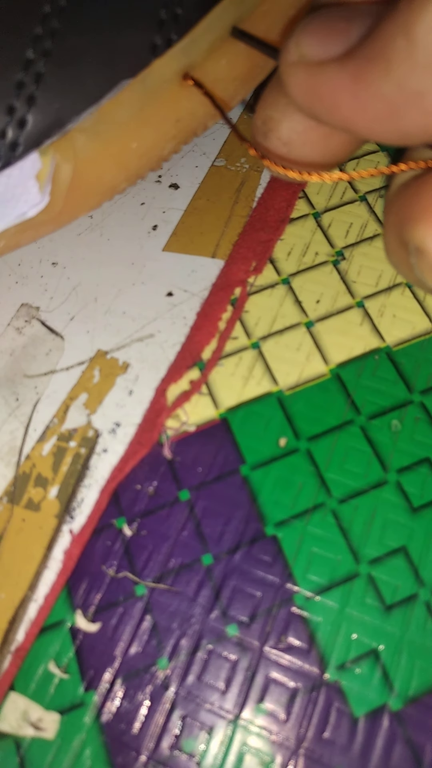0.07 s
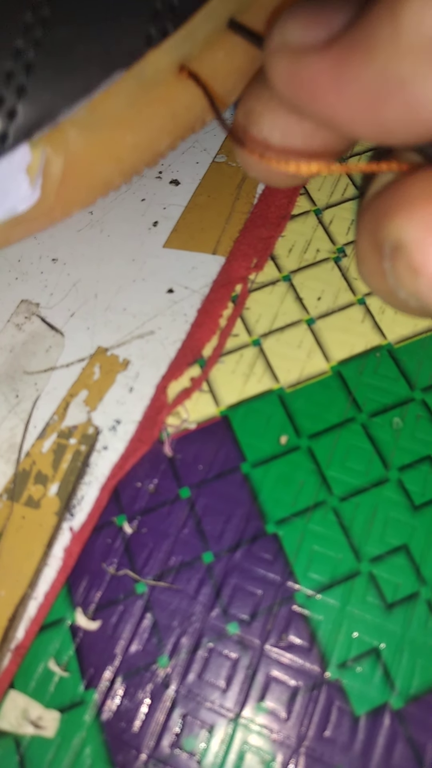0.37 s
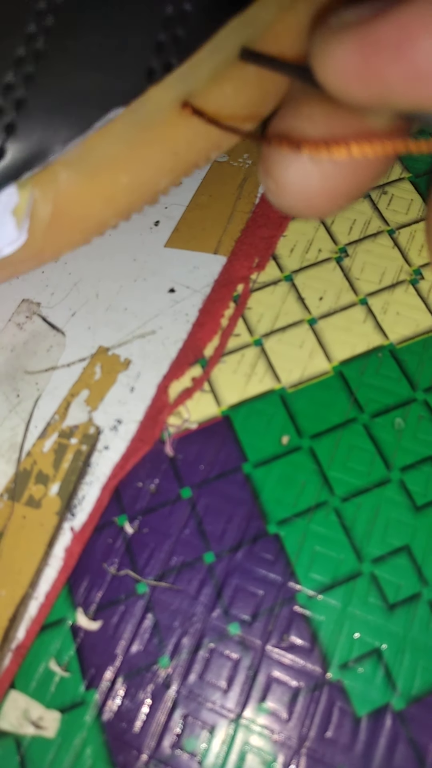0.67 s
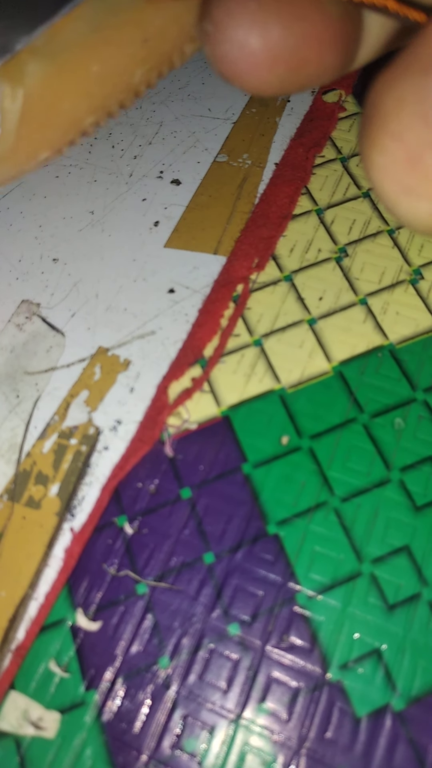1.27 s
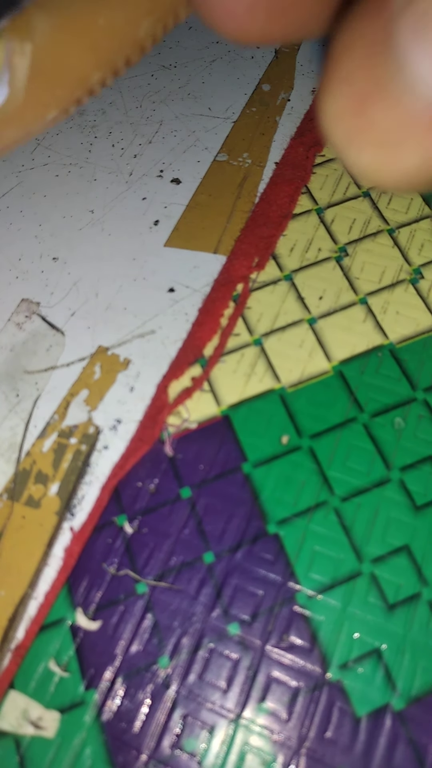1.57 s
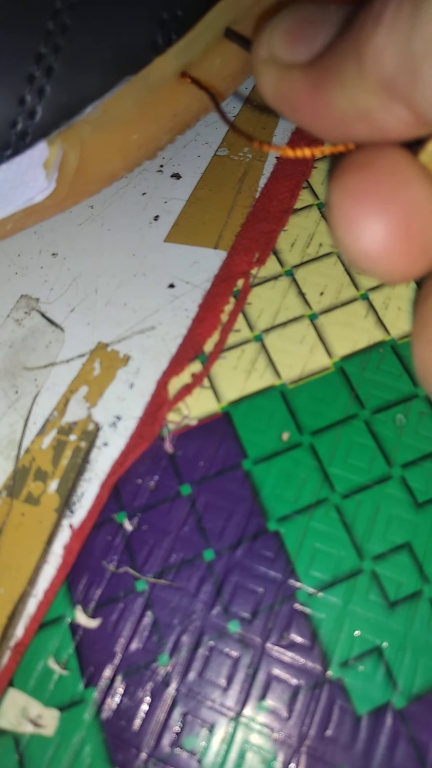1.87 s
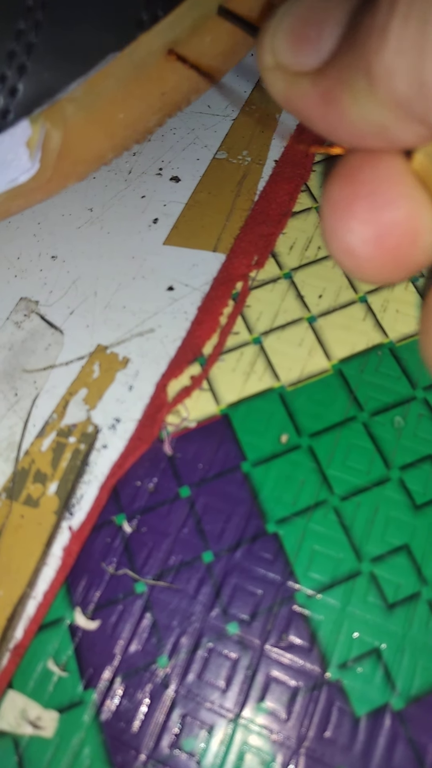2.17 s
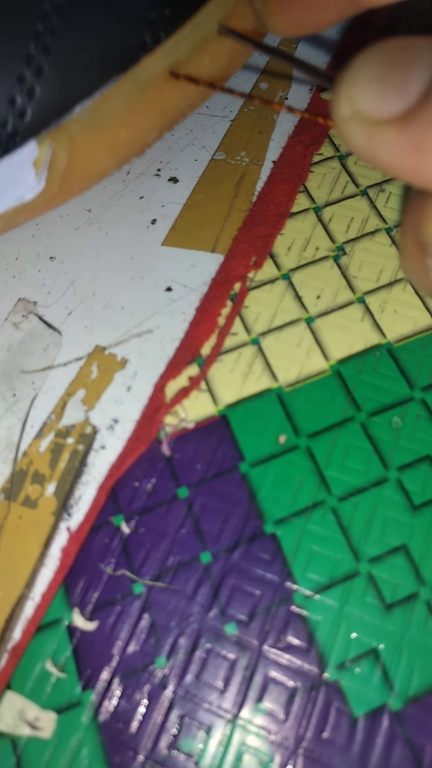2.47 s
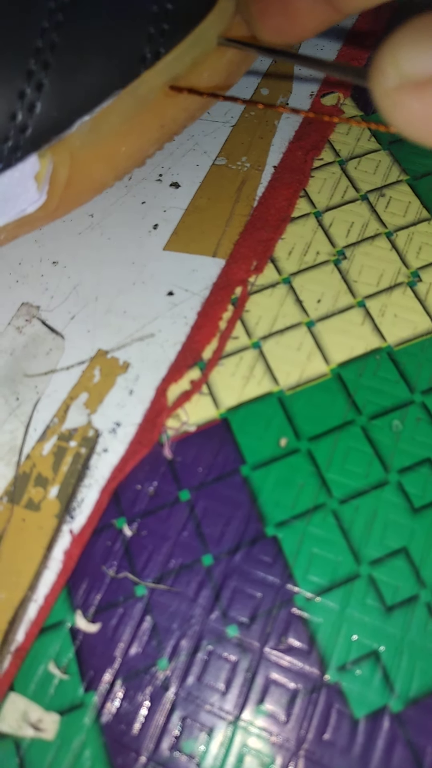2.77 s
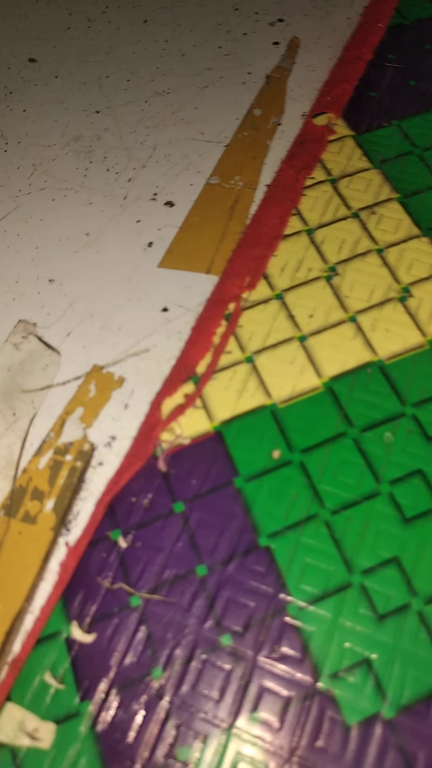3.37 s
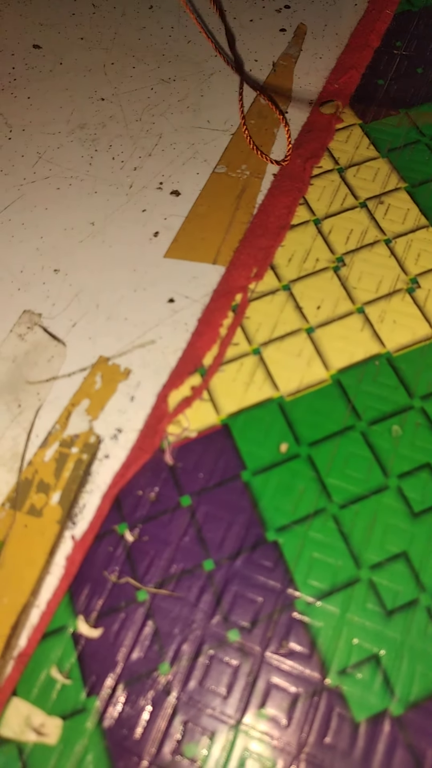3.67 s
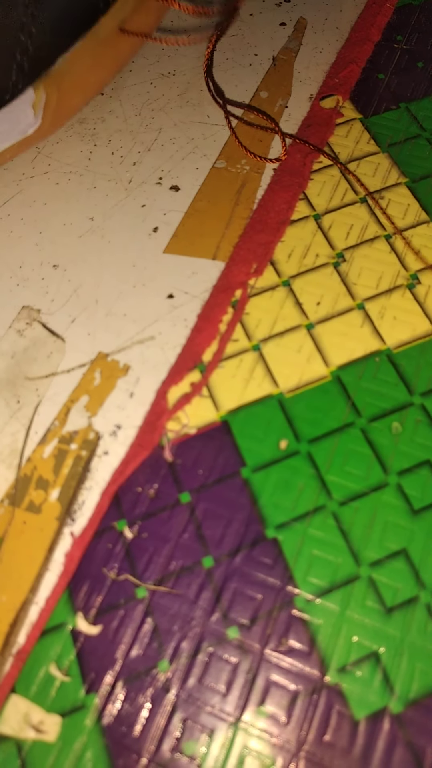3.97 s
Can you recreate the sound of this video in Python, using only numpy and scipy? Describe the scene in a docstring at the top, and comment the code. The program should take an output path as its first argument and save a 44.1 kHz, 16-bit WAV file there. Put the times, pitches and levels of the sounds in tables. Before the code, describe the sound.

Close hand stitching of a shoe, with rasping thread pulls and sharp awl clicks.

```python
"""Waxed thread is worked through a rubber shoe sole with a hooked awl, close to a hand-held camera.
The awl snaps in and out of the rubber and sets the shoe ringing; the thread rubs, squeaks, judders
as it sticks and slips, and swishes through. The shoe takes a last knock. Underneath are soft bumps
of fingers on the camera and a quiet room, all picked up in stereo by two microphone ports."""
import sys
import numpy as np
from scipy import signal
from scipy.fft import rfft, irfft
from scipy.io import wavfile
from scipy.ndimage import uniform_filter1d

SR = 44100
rng = np.random.default_rng(int(sys.argv[2]) if len(sys.argv) > 2 else 0)


def pcm_store(signal):
    """Save signal as 16-bit PCM."""
    levels = np.round(np.clip(np.atleast_2d(signal), -1, 1) * 32767)
    wavfile.write(sys.argv[1], SR, levels.astype(np.int16).T)


N = 176400
T, HZ = np.arange(N) / SR, np.fft.rfftfreq(N, 1 / SR)
FLUTTER_HZ, ROUGHNESS_HZ = 58, 220  # how fast the contact wavers
BODY_SAME, RASP_SAME, FIZZ_SAME = 0.87, 0.41, 0.2  # likeness of left and right, 0 to 1
BUMP_WIDTH_S = .014

# Colour of the shoe's body when rubbed. Each row: frequency in Hz, spectral level in dB.
SHOE_BODY = [(150, -28), (290, -13), (420, -6), (500, -5.5), (660, -1), (850, -6.5), (1100, -8),
             (1290, -13), (1500, -20), (3000, -59)]
# Fingers bumping the camera. Each row: centre in seconds, pitch in Hz, level in dB.
HANDLING_BUMPS = [(.02, 125, -46), (.078, 100, -45), (.128, 190, -51), (.125, 290, -53), (.185, 140, -46),
                  (.265, 100, -45.5), (.275, 375, -54), (.405, 110, -51), (.648, 95, -45), (.8, 105, -52),
                  (.874, 100, -44), (.96, 180, -52), (1.0, 95, -46), (1.1, 175, -50), (1.145, 92, -44),
                  (1.25, 155, -48), (1.297, 98, -43), (1.405, 138, -47), (1.475, 105, -43),
                  (1.538, 100, -43), (1.785, 105, -41), (2.945, 140, -44), (3.05, 180, -50),
                  (3.1, 110, -45), (3.29, 155, -45), (3.455, 120, -46), (3.5, 135, -43), (3.63, 105, -45),
                  (3.69, 200, -52)]


def amp(db):
    """Decibels to gain."""
    return 10 ** (np.asarray(db) / 20)


def unit(x):
    """Scales to rms 1."""
    return x / np.sqrt(np.mean(x ** 2) + 1e-20)


def read(points, hz):
    """Reads a table on a log-frequency axis."""
    f, value = np.transpose(points)
    return np.interp(np.log(hz + 1), np.log(f + 1), value)


def colour(x, spectrum):
    """Filters x by a spectrum, at rms 1."""
    return unit(irfft(rfft(x) * amp(read(spectrum, HZ)), N))


def wander(hz):
    """Random drift up to about the given rate, at rms 1."""
    return unit(irfft(rfft(rng.standard_normal(N)) / (1 + (HZ / hz) ** 4), N))


def pair(x, same):
    """Makes two unrelated channels partly alike."""
    return np.array([same * x[1] + np.sqrt(1 - same ** 2) * x[0], x[1]])


def add(mix, start, sound):
    """Mixes a sound in at a time in seconds."""
    part = mix[max(round(start * SR), 0):][:len(sound)]
    part += sound[:len(part)]


def envelope(start, hold, rise, fall):
    """Full from start for the hold time; 20 dB down one rise time before and one fall time after."""
    away = np.maximum(start - T, 0) / rise + np.maximum(T - start - hold, 0) / fall
    return amp(-20 * away.clip(0, 10))


def friction(spectrum, same):
    """Tiny catches of fibre over a hiss whose colour shifts in patches as the contact moves."""
    catches_per_s, spread_db, catch_share, patch_db = 2500, 3.5, 0.34, 2.4
    sizes = amp(spread_db * np.minimum(rng.exponential(1, N), 4))
    caught = rng.random(N) < catches_per_s / SR
    catches = unit(sizes * caught * rng.standard_normal((2, N)))
    drive = np.sqrt(catch_share) * catches + np.sqrt(1 - catch_share) * rng.standard_normal((2, N))
    frames = signal.stft(pair(drive, same), nperseg=512)[2]
    patches = uniform_filter1d(rng.standard_normal(frames.shape[1:]), size=5, axis=0)
    patches = unit(uniform_filter1d(patches, size=10, axis=1))
    patchy = signal.istft(frames * amp(patch_db * patches), nperseg=512)[1][:, :N]
    return colour(patchy, spectrum)


def thread_strokes():
    """Thread and fingers rub the rubber; each stroke sounds the shoe's body, a rasp and a fizz."""
    # Each row: start of the hold, hold, rise and fall in seconds, then body, rasp and fizz in dB.
    strokes = [(0.381, .018, 0.094, 0.013, -58, -76, -73), (0.498, 0.016, 0.089, 0.04, -59, -65.5, -64.5),
               (0.635, 0.016, .018, 0.07, -44, -50, -45.5), (1.43, .012, .004, .05, -58, -64, -67),
               (1.502, .02, .015, .03, -55, -70, -57), (1.735, 0.06, 0.17, 0.093, -47, -58.5, -56),
               (1.857, 0.12, .1, 0.3, -47, -54, -55), (2.33, 0.07, 0.3, 0.23, -61, -61, -64),
               (2.564, 0.13, 0.15, 0.3, -58.5, -69, -64.5), (2.728, 0.04, 0.006, 0.025, -50, -57, -59),
               (2.795, 0.055, 0.052, 0.12, -41.5, -49.5, -52.5),
               (2.929, 0.034, 0.036, 0.024, -41.5, -47.5, -48), (2.96, 0.031, 0.032, 0.3, -51, -54, -54),
               (3.326, 0.028, 0.013, 0.047, -39, -47.5, -42.5),
               (3.366, 0.034, 0.018, 0.044, -29, -45.5, -39), (3.412, .02, 0.035, 0.15, -54, -56, -55),
               (3.591, .01, .007, .12, -52, -60, -68), (3.712, .035, .012, .13, -49.5, -62, -66),
               (3.863, 0.05, 0.06, 0.3, -48.5, -60, -61.5)]
    # Colours of the rasp and of the higher fizz. Each row: frequency in Hz, spectral level in dB.
    rasp_colour = [(700, -39), (1400, -3.5), (3300, 1.5), (4500, -2), (7500, -6), (12000, -40)]
    fizz_colour = [(3000, -27), (5500, -6.5), (7700, 2), (8800, 0), (10500, -5.5), (12500, -9),
                   (16000, -13.5)]
    power = np.zeros((3, N))
    for start, hold, rise, fall, body_db, rasp_db, fizz_db in strokes:
        power += (amp([[body_db], [rasp_db], [fizz_db]]) * envelope(start, hold, rise, fall)) ** 2
    body, rasp, fizz = np.sqrt(power) * amp(1.33 * wander(FLUTTER_HZ))
    return (body * friction(SHOE_BODY, BODY_SAME)
            + rasp * friction(rasp_colour, RASP_SAME)
            + fizz * friction(fizz_colour, FIZZ_SAME))


def thread_drag():
    """Waxed thread drags through the hole: a narrow rasp that comes in quick, uneven catches."""
    # Colour of the drag. Each row: frequency in Hz, spectral level in dB.
    drag_colour = [(450, -30), (800, -2), (1230, 0), (1650, -30)]
    rasp = unit(friction(drag_colour, BODY_SAME) * amp(3 * wander(ROUGHNESS_HZ)))
    return amp(-41.5) * envelope(start=1.875, hold=.12, rise=.1, fall=.26) * rasp


def thread_swish():
    """The last length runs free: a bright swish that stops as the thread's end leaves the hole."""
    # Colour of the swish. Each row: frequency in Hz, spectral level in dB.
    swish_colour = [(2000, -13), (4300, -2), (8000, 0), (11000, -4), (16000, -19)]
    swell = amp(-40.5) * envelope(start=3.08, hold=.07, rise=.055, fall=.036)
    return swell * friction(swish_colour, FIZZ_SAME)


def thread_squeaks():
    """Taut thread sings a wavering note and its octave."""
    # Each row: start and length in seconds, pitch in Hz, level in dB, octave against the note in dB.
    squeaks = [(2.225, .22, 6140, -55, -6), (3.537, .055, 5512, -55, -12)]
    out = np.zeros(N)
    for start, length, hz, db, octave_db in squeaks:
        phase = 2 * np.pi * np.cumsum(hz * (1 + 0.0058 * wander(hz=250))) / SR
        arch = np.sin(np.pi * np.clip((T - start) / length, 0, 1) ** .55) ** 2  # peaks early
        note = np.sin(phase) + amp(octave_db) * np.sin(2 * phase)
        out += amp(db + 4 * wander(hz=50)) * arch * note
    return out


def thread_judder():
    """Stick-slip pulses slow down and grow dull as the thread gives; each slip crackles in the shoe."""
    # Each row: time in seconds, slips per second, level in dB, treble roll-off in Hz.
    course = [(2.729, 104, -51, 450), (2.75, 113, -28.5, 500), (2.778, 90, -30.5, 420),
              (2.799, 85, -34, 120), (2.875, 80, -37.5, 100), (2.91, 87, -43, 100)]
    times, rate, db, rolloff_hz = np.transpose(course)
    on = (T > times[0]) & (T < times[-1])
    hz = np.interp(T, times, rate) * (1 + .07 * wander(FLUTTER_HZ))
    phase = 2 * np.pi * np.cumsum(hz * on) / SR
    harmonic = np.arange(1, 9)[:, None]
    weight = harmonic ** -.7 / (1 + (harmonic * hz / np.interp(T, times, rolloff_hz)) ** 10) ** .5
    slips = (weight * np.cos(harmonic * phase)).sum(0) / np.sqrt((weight ** 2).sum(0) / 2)
    bursts = rng.standard_normal(N) * on * np.maximum(np.cos(phase), 0) ** 2
    crackle = colour(bursts, SHOE_BODY) * np.sqrt(on.mean())
    roughness = 1 + .3 * wander(ROUGHNESS_HZ)
    return on * amp(np.interp(T, times, db)) * slips * roughness + amp(-45) * crackle


def awl_snaps():
    """The awl snaps and knocks on the sole: a short crack and the quickly damped modes of the shoe."""
    # Each row: start in seconds, level in dB, then thud, clack and tick in dB, which tint the ring.
    snaps = [(0.6426, -30, -1, 1, 10), (0.6475, -34, 14, -4, 12), (1.517, -18.5, -3.5, 6, -2),
             (1.7333, -10, -10, -12.5, -6), (1.7765, -35, 20, -8, -12), (2.9505, -22, 1, -17, -10),
             (3.3311, -13, 9.5, 2.5, -1)]
    # Modes of the shoe. Each row: frequency in Hz, level in dB, seconds to fall 60 dB.
    modes = [(146.4, -15.5, 0.055), (255, -14.5, 0.04), (405, -6, 0.045), (563, -2, 0.034),
             (660, 2.5, 0.03), (850, -4, 0.028), (1063, -3, 0.023), (1236, -4.5, 0.027),
             (1523, -5.5, 0.042), (1943, -6, 0.019), (2610, -7.5, 0.01), (3900, -14, .01)]
    thud_hz, clack_hz, tick_hz = 290, 1210, 2130
    crack_decay_s, crack_top_hz = 0.0017, 4200
    out, t = np.zeros(N), np.arange(SR // 5) / SR
    for start, db, thud_db, clack_db, tick_db in snaps:
        tint = [(thud_hz, thud_db), (2 * thud_hz, 0), (clack_hz, clack_db), (tick_hz, tick_db)]
        ring = sum((-1) ** k * amp(level + read(tint, hz) - 60 * t / t60) * np.sin(2 * np.pi * hz * t)
                   for k, (hz, level, t60) in enumerate(modes))
        burst = np.exp(-t / crack_decay_s) * rng.standard_normal(len(t))
        crack = signal.lfilter(*signal.butter(5, crack_top_hz, fs=SR), burst)
        add(out, start, amp(db) * (ring + amp(tick_db - .5) * crack))
    return out


def zips_and_clicks():
    """Brief high zips and the bright clicks of the awl's snaps, in one thin resonance."""
    # Each row: centre in seconds, half length in seconds, level in dB.
    bursts = [(0.64, 0.011, -43), (1.5185, .002, -42), (1.7355, .005, -42), (1.851, 0.012, -48.5),
              (3.332, 0.0058, -32)]
    # The thin resonance. Each row: frequency in Hz, spectral level in dB.
    resonance = [(6200, -24), (7300, 2), (7900, 0), (8600, -12), (15000, -20)]
    swells = sum(amp(db) * np.exp(-((T - centre) / half) ** 2 / 2) for centre, half, db in bursts)
    return swells * friction(resonance, FIZZ_SAME)


def handling_bumps():
    """Fingers shift on the camera: a few low, uneven cycles each, at a pitch that slides with the grip."""
    out, t = np.zeros(N), np.arange(-SR // 10, SR // 10) / SR
    for centre, hz, db in HANDLING_BUMPS:
        glide_hz_per_s = 900 * rng.standard_normal()
        cycles = hz * t + glide_hz_per_s * t ** 2 / 2 + rng.random()
        bump = amp(db) * np.exp(-(t / BUMP_WIDTH_S) ** 2 / 2) * np.cos(2 * np.pi * cycles)
        add(out, centre + t[0], bump[t >= -centre])
    return np.sqrt(2) * out * (1 + .25 * wander(FLUTTER_HZ))


def handling_rumble():
    """A hollow rumble surrounds each bump, and runs on while the hands keep moving."""
    # Longer hand movements. Each row: start and hold in seconds, level in dB.
    moves = [(1.65, .26, -48), (2.25, .46, -45.5), (3.87, .09, -43)]
    # Colour of the rumble. Each row: frequency in Hz, spectral level in dB.
    rumble_colour = [(45, -22), (82, 0), (140, -5), (240, -25), (360, -17), (480, -33), (1500, -90)]
    long = sum(amp(db) * envelope(start, hold, rise=.03, fall=.03) for start, hold, db in moves)
    short = sum(amp(db - 9) * np.exp(-((T - centre) / (2 * BUMP_WIDTH_S)) ** 2)
                for centre, _, db in HANDLING_BUMPS)
    return (long + short) * colour(rng.standard_normal(N), rumble_colour)


def room_reflections(x):
    """The room returns sparse, fast-dying reflections, different at each microphone port."""
    delay_s, t60_s = 0.0047, 0.14
    t = np.arange(SR // 3) / SR
    taps = rng.standard_normal((2, len(t))) * (rng.random((2, len(t))) < .08)
    taps *= (t > delay_s) * amp(-60 * t / t60_s)
    taps /= np.linalg.norm(taps, axis=1, keepdims=True)
    return amp(-16.5) * signal.fftconvolve(x[None], taps, axes=1)[:, :N]


def room_tone():
    """The faint, steady noise of a quiet room."""
    # Each row: frequency in Hz, spectral level in dB.
    room_colour = [(100, 0), (310, -17), (430, 5), (600, -2), (1000, -10), (2000, -15), (5000, -21),
                   (7800, -13), (10000, -19.5), (16000, -24)]
    return amp(-65.3) * colour(pair(rng.standard_normal((2, N)), same=0.32), room_colour)


def scene():
    """Stitching close to the microphone, over handling noise and room tone."""
    hits = awl_snaps() + thread_judder()
    background = room_tone() + room_reflections(hits)
    stitching = thread_strokes() + thread_drag() + thread_swish() + zips_and_clicks() + thread_squeaks()
    return stitching + hits + handling_bumps() + handling_rumble() + background


def record(dry):
    """The camera's two microphone ports each have their own colour and delay; then the band limits."""
    # Balance of the ports. Each row: frequency in Hz, left minus right in dB.
    balance = [(190, 0.5), (310, 3.5), (430, 10.5), (540, -1), (660, -10), (850, 3.5), (1100, 11.5),
               (1400, 5), (2000, -5), (4000, -2.5), (7600, -12), (10000, -5.5), (13000, -6.5)]
    # Phase between the ports. Each row: frequency in Hz, lead of the left in radians.
    phase = [(90, -0.2), (190, -0.35), (330, -1.4), (700, -1.6), (1120, -1.4), (2930, -8.5), (5170, -8),
             (13000, -23.5)]
    low_cut_hz, high_cut_hz = 46, 15900
    ratio, lead = amp(read(balance, HZ)), read(phase, HZ)
    ports = np.array([ratio * np.exp(.5j * lead), np.exp(-.5j * lead)]) / np.sqrt((1 + ratio ** 2) / 2)
    low_cut = signal.freqs(*signal.butter(4, low_cut_hz, 'high', analog=True), HZ)[1]
    high_cut = signal.firwin(511, high_cut_hz, window=("kaiser", 9), fs=SR)
    heard = irfft(rfft(dry) * ports * low_cut, N)
    return signal.oaconvolve(heard, high_cut[None], "same")


dry = scene()
out = record(dry)
pcm_store(out)
```